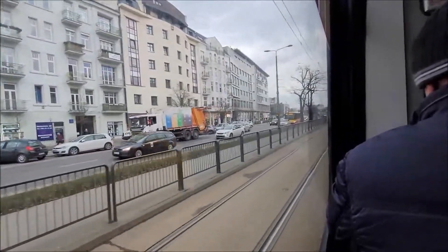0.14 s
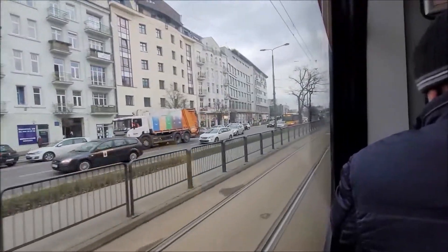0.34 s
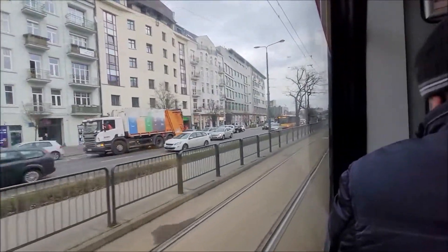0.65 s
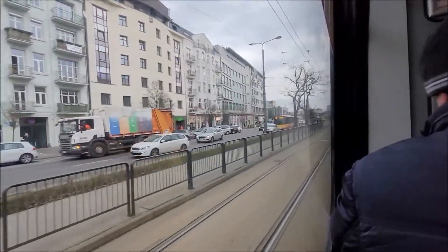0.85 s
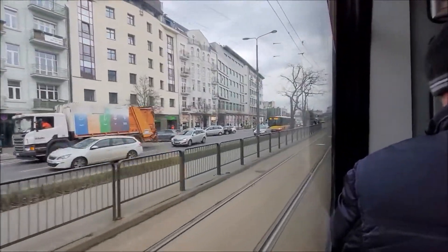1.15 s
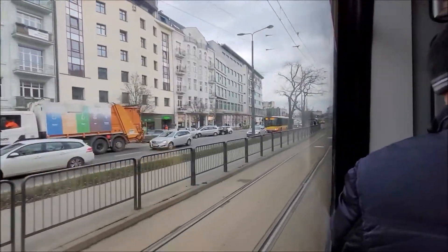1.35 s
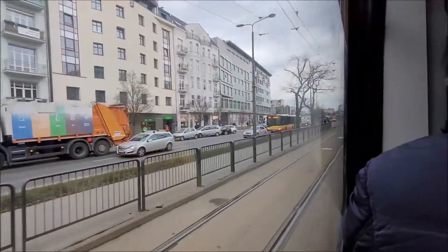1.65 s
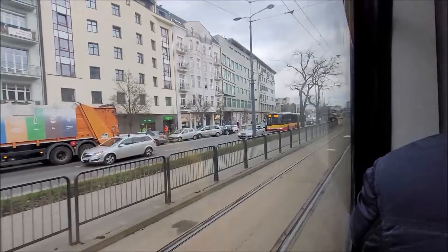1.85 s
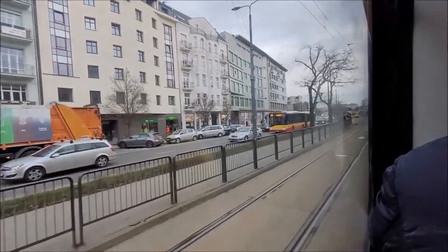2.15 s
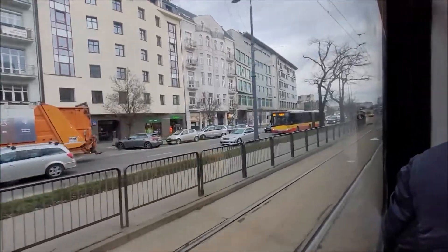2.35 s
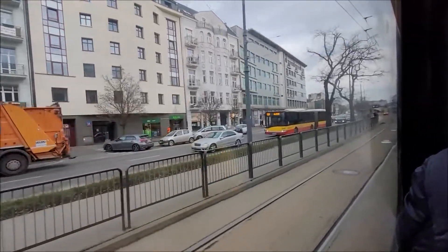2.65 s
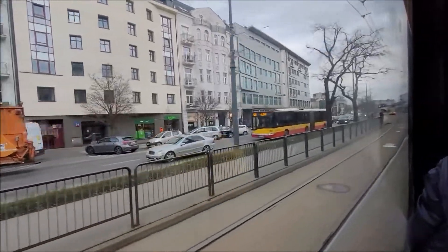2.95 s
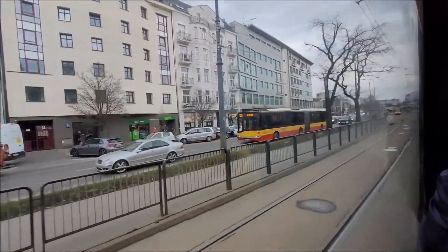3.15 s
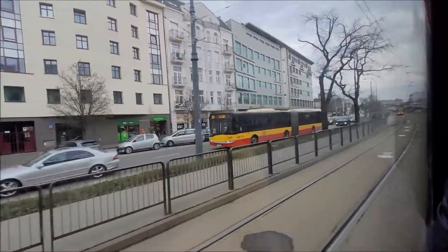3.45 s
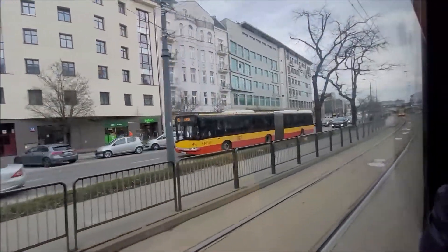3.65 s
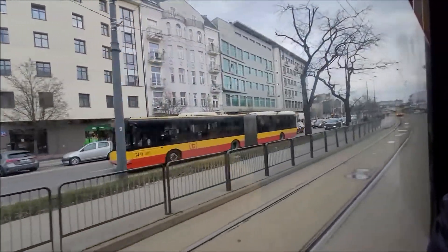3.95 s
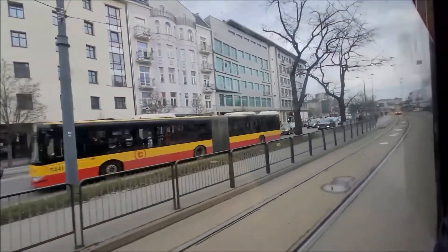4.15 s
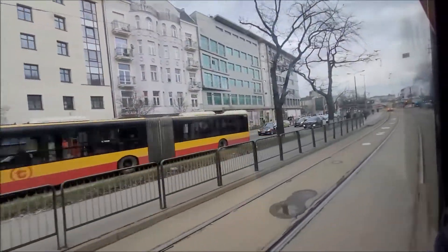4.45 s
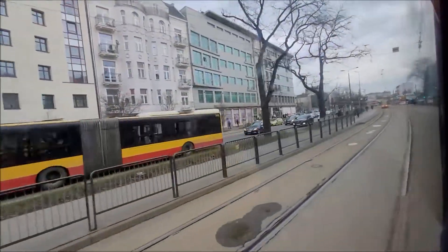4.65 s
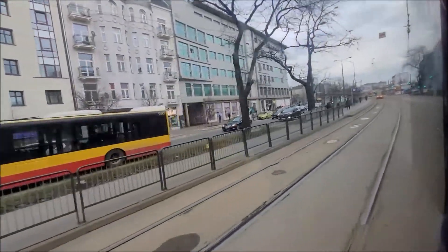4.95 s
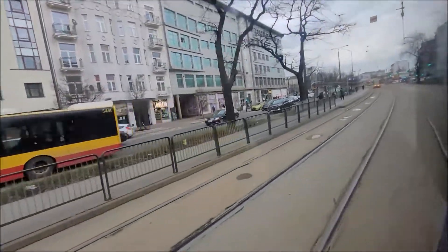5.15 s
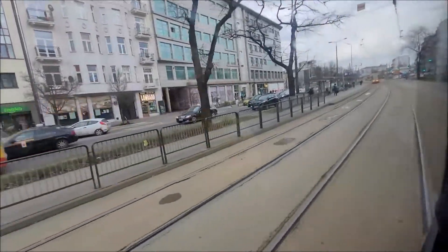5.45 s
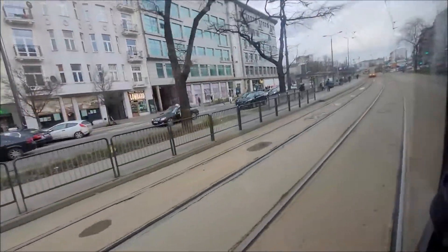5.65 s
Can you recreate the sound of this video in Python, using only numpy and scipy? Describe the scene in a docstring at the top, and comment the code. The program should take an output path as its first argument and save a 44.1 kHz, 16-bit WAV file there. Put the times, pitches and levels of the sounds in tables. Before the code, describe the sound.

Stereo from inside a rolling tram. A bass-heavy rumble and throbbing drone run throughout, with a soft gear tone sinking in pitch and fading by about 1.5 seconds. Rippled rail makes the drone surge and growl mid-way, then it eases. After five seconds a cluster of heavy thuds and clacks shakes the car, with small rattles and ticks behind and a faint steel hiss.

```python
"""Tram wheels roll along a street, heard in stereo from inside the car.
The wheels are noise and wavering modes: a throbbing drone that surges on rippled rail, a body boom and shake
at bumps, rumble, rush and roar; struck modes knock at gaps. A gear tone sinks in pitch and fades.
Farther back, filtered noise hisses as steel slides on steel, high harmonics and two narrow noise bursts
squeak thinly, and other short noise bursts tick, snap and rattle as loose fittings."""
import sys
import numpy as np
from scipy import signal
from scipy.fft import rfft, irfft
from scipy.io import wavfile
from scipy.ndimage import uniform_filter1d

SR = 44100
rng = np.random.default_rng(int(sys.argv[2]) if len(sys.argv) > 2 else 0)


def transcribe(signal):
    """Save signal, clipped to [-1, 1], as a 16-bit WAV file at the path in sys.argv[1]."""
    frames = np.atleast_2d(signal).T
    limited = np.clip(frames, -1, 1)
    pcm = np.round(limited * 32767).astype(np.int16)
    wavfile.write(sys.argv[1], SR, pcm)


N = 255780
TIME = np.arange(N) / SR  # seconds

# Likeness of the left and right microphones. Each row: frequency in Hz, correlation from -1 to 1.
LIKENESS = [(30, 1), (70, 0.8), (140, 0.98), (250, 0.92), (500, 0.62), (850, 0.16), (1250, -0.34),
            (1900, 0.1), (3000, -0.17), (15000, -0.09)]
# Lean of the stereo picture. Each row: frequency in Hz, left minus right in dB.
LEAN = [(30, -2.5), (70, -0.5), (130, -1.3), (280, 2), (600, 3), (1000, 2.5), (1600, -0.5), (2400, 4),
        (4000, 1), (8000, -7), (15000, 0.5)]
EDGE_HZ = 15750  # upper band limit of the recorder

# Ticks of small loose fittings. Each row: start in seconds, level in dB before a common trim, ring in Hz.
TICKS = [(1.281, -56, 5770), (1.3955, -63, 5500), (2.119, -66, 11000), (2.198, -61.5, 10500),
         (2.347, -60.5, 10500), (2.365, -61, 10500), (2.718, -58, 11000), (2.774, -52, 7000),
         (2.811, -53, 6940), (2.85, -55, 6960), (3.297, -65, 13300), (3.5367, -60, 6940),
         (3.636, -51, 3980), (3.889, -63, 12000), (4.035, -55, 7300), (4.2678, -56, 7300),
         (4.6915, -50, 7450), (5.1595, -48, 7560), (5.193, -55, 7700), (5.2352, -54, 7600),
         (5.306, -48.5, 7740), (5.461, -47.5, 10800), (5.6442, -47, 8200), (5.7294, -41.5, 7750)]
# Snaps of the window frames as the body twists. Each row: start in seconds, level in dB, centre in Hz.
SNAPS = [(2.0478, -53.5, 6500), (3.0772, -53, 8000), (4.616, -52, 4000), (5.084, -44, 3400),
         (5.088, -49, 3400), (5.2395, -45, 2200), (5.257, -46, 2800), (5.2692, -39.5, 2100)]
# Rattles and knocks of loose panels, and two brief narrow squeaks (4.47, 4.61). Each row: start in seconds,
# level in dB before a common trim, length in seconds (the swell peaks at half of it), centre in Hz,
# spread in octaves.
RATTLES_AND_SQUEAKS = [(1.192, -64, 0.026, 2500, 1.1), (1.477, -45.5, 0.061, 2180, 0.55),
                       (1.501, -50, .026, 3200, .8), (1.589, -49, 0.041, 1500, 0.78),
                       (2.033, -58, .03, 3000, 1.3), (2.219, -46, 0.0057, 804, 0.8),
                       (2.496, -53, 0.034, 1900, 0.63), (2.657, -46, 0.054, 950, 1.1),
                       (2.955, -39, 0.028, 920, 0.48), (2.965, -54, 0.033, 1790, 1),
                       (3.06, -45, 0.06, 1250, 0.94), (3.63, -61, 0.039, 3900, 0.42),
                       (3.665, -63, .06, 3700, .5), (4.47, -63, .045, 5700, .08),
                       (4.61, -66, 0.043, 4820, .08), (4.91, -50, .005, 1500, .8),
                       (5.248, -61, 0.042, 2600, 0.55)]

# Squeak of steel on steel. Each row: harmonic number, level in dB.
SQUEAK_HARMONICS = [(7, -6), (8, 0), (9, -2), (10, 1), (11, -1)]
SQUEAK_HZ = 1423  # fundamental, itself unheard
# Squeaks. Each row: peak in seconds, length in seconds, level in dB.
SQUEAKS = [(4.15, 0.037, -64.5), (4.3, .04, -73), (4.46, 0.08, -64), (4.67, 0.05, -65), (4.975, .04, -59)]
# Faint ringing of a wheel. Each row: peak in seconds, length in seconds, level in dB.
RINGS = [(3.27, 0.056, -77), (3.48, 0.077, -81), (3.78, .04, -77), (5.35, 0.12, -79)]

# Steady sliding of steel on steel. Each row: time in seconds, hiss in dB, fine fizz in dB.
SLIDE = [(0, -69, -71), (.22, -66, -74), (.6, -62, -63.5), (1.05, -66, -70.5), (1.45, -63, -74),
         (1.85, -68, -74), (2.75, -64, -71.5), (3.0, -66.5, -73), (3.5, -67.5, -74), (3.84, -66, -72),
         (3.96, -60.5, -65.5), (4.7, -60, -66), (4.85, -65, -68), (5.4, -57, -62.5), (5.78, -57.5, -61)]
# Brief rubs of a wheel on the rail. Each row: peak in seconds, length in seconds, hiss in dB, fizz in dB.
RUBS = [(.08, 0.043, -60, -61), (.32, 0.068, -57.5, -58), (.57, .05, -61.5, -76), (1.21, 0.056, -63, -68),
        (1.533, 0.034, -56.5, -69), (2.06, 0.018, -63, -68), (2.72, 0.023, -62.5, -65),
        (3.115, .035, -61.5, -70.5), (3.685, 0.031, -62.5, -66), (4.93, .03, -58.5, -62.5)]
# Scrapes of a wheel flange. Each row: peak in seconds, length in seconds, level in dB.
SCRAPES = [(2.73, 0.056, -68.5), (2.815, 0.02, -65), (2.868, 0.015, -70)]
# Colours of the sliding layers. Each row: frequency in Hz, relative density in dB per Hz.
HISS_COLOUR = [(1200, -24.5), (2500, -4.5), (3700, 2.5), (4800, 0.5), (6000, -4), (7900, -3), (9200, -11),
               (15000, -34.5)]
FIZZ_COLOUR = [(3000, -28), (6500, -7.5), (9300, 1), (11500, 2.5), (13500, 1), (15700, -5)]
SCRAPE_COLOUR = [(3500, -28), (5600, -0.5), (6400, 3), (8100, 1), (9300, -16.5), (13000, -31)]

# Pitch of the meshing gear teeth. Each row: time in seconds, pitch in Hz.
GEAR_PITCH = [(0, 171.5), (.3, 167.5), (.75, 160.8), (1.0, 158.6), (1.6, 152.5)]
# Load on the gears. Each row: time in seconds, level in dB.
GEAR_LEVEL = [(0, -33), (.04, -32.5), (.3, -29.5), (.74, -31.5), (.9, -26.5), (1.3, -25), (1.42, -39.5),
              (1.65, -44)]
# Whine of the other gears. Each row: time in seconds, level in dB.
WHINE_LEVEL = [(0, -62), (.6, -60), (.85, -63), (1.15, -59.5), (1.38, -54), (1.5, -63), (1.9, -72)]
# Other gears turning with the mesh. Each row: ratio to the mesh pitch, level in dB.
GEAR_ORDERS = [(3, -2), (4.82, 0)]

# Roar of the wheel treads. Each row: time in seconds, level in dB.
ROAR = [(0, -51.5), (.35, -48), (.9, -50.5), (1.55, -47.5), (1.75, -51.5), (2.3, -52), (2.6, -51.5),
        (3.08, -51.5), (3.28, -54.5), (3.65, -51.5), (4.3, -52.5), (5.02, -51.5), (5.35, -45.5),
        (5.78, -48)]
# Colours of the rolling layers and the body shake. Each row: frequency in Hz, relative density in dB per Hz.
ROAR_COLOUR = [(300, -29.5), (600, 1.5), (850, 1), (1120, 1), (1250, -0.5), (1480, 1.5), (1720, -3),
               (1930, -4), (2100, -7.5), (2350, -9.5), (2900, -13.5), (5000, -39)]
RUSH_COLOUR = [(110, -21), (160, 5.5), (190, 2), (232, 8), (295, 0), (340, -3.5), (440, 0), (540, 1),
               (700, -5.5), (850, -11.5), (1100, -21), (2500, -55)]
RUMBLE_COLOUR = [(60, -30), (100, 5), (128, 5), (157, 7), (190, 0), (232, 2.5), (262, -3), (295, -1.5),
                 (335, -8.5), (375, -6.5), (420, -12), (520, -33), (1100, -46.5), (3000, -80)]
SHAKE_COLOUR = [(10, -22.5), (23, 0), (31, -16), (41, -8), (51, 0.5), (63, -5.5), (80, -19.5), (160, -75.5)]

# Knocks of the wheels at gaps in the rail. Each row: start in seconds, thud in dB, clack in dB.
KNOCKS = [(0.502, -35, -57), (0.552, -35, -47), (2.146, -47, -51), (2.397, -51, -44), (2.619, -42, -45.5),
          (2.756, -31.5, -48), (2.965, -35, -43.5), (3.532, -61, -42), (3.812, -51, -59), (4.367, -37, -56),
          (5.081, -32, -48), (5.134, -24, -53), (5.186, -43, -49), (5.221, -26.5, -44), (5.248, -34, -50),
          (5.265, -40, -45), (5.372, -24, -35.5), (5.479, -21.5, -41), (5.504, -23, -51.5),
          (5.557, -25.5, -42), (5.631, -34, -50), (5.671, -32, -40)]
# Modes a knock rings: floor (thud), running gear (clack). Each row: pitch in Hz, level in dB,
# 60 dB decay in seconds.
THUD_MODES = [(170, -1.5, 0.12), (240, 5, 0.066), (308, 0.5, 0.072), (375, -1.5, 0.026)]
CLACK_MODES = [(495, -1, 0.045), (568, -1, 0.088), (670, -6, 0.024), (830, -6, 0.068), (1240, -11, 0.023)]

# Roughness of the rail under the wheels. Each row: time in seconds, dB above smooth rail.
TRACK = [(0, 4.5), (1.55, 0.5), (1.8, -1.5), (2.2, 2.5), (2.48, 9.5), (3.05, 7.5), (3.3, 3.5), (3.6, 6.5),
         (4.1, 5.5), (4.45, 0.5), (5.03, 2), (5.2, 9), (5.55, 11.5), (5.78, 5)]
# Bumps at dips and joints in the rail. Each row: peak in seconds, length in seconds, body shake in dB,
# floor boom in dB, rumble in dB, rush in dB.
BUMPS = [(.275, 0.034, -22, -24.5, -24.5, -52), (.54, 0.027, -26, -31.5, -26.5, -36),
         (.65, 0.038, -30.5, -26.5, -47, -40), (1.35, 0.27, -41, -36, -46, -55),
         (1.53, 0.16, -48, -49, -34.5, -43.5), (2.67, 0.033, -43.5, -22, -31.5, -41),
         (2.96, 0.077, -36, -31, -29.5, -49), (3.91, 0.057, -37, -26.5, -31, -50),
         (4.22, 0.039, -35, -21.5, -40, -63), (4.48, 0.022, -52, -19.5, -52, -57),
         (4.76, 0.19, -46, -24.5, -36.5, -64), (5.118, 0.032, -40, -20.5, -35.5, -45),
         (5.26, 0.12, -33, -18.5, -26.5, -53), (5.394, 0.0061, -16, -10, -39, -43),
         (5.51, 0.068, -29, -17.5, -27, -40), (5.65, 0.048, -24, -38, -33, -40),
         (5.78, 0.033, -41, -15.5, -34, -37)]
# How each layer follows the track: level on smooth rail in dB, dB per dB of roughness.
SHAKE_LAW, BOOM_LAW = (-37.5, -.2), (-36.5, .55)
RUMBLE_LAW, RUSH_LAW = (-37.3, .9), (-44.2, .36)
DRONE_LAW = (-31, .27)

# Patches of rippled rail. Each row: peak in seconds, length in seconds, drone in dB, growl in dB.
RIPPLES = [(2.395, 0.023, -15.5, -26), (2.505, 0.033, -15.5, -25.5), (2.68, 0.047, -14.5, -29),
           (2.86, 0.16, -24, -33), (3.0, 0.085, -22.5, -32), (3.25, 0.053, -25.5, -36),
           (3.44, 0.071, -32, -32.5), (3.59, 0.046, -23.5, -29.5), (3.86, 0.11, -47, -38),
           (4.52, 0.036, -22.5, -47), (4.68, 0.017, -18, -54), (4.77, 0.011, -20, -50),
           (4.9, 0.072, -21.5, -60), (5.23, 0.018, -26.5, -51), (5.65, 0.092, -37, -39)]
# Drone of the wheels. Each row: time in seconds, pitch in Hz.
DRONE_PITCH = [(0, 105.5), (2.2, 106), (2.5, 100.5), (2.72, 104), (3.3, 105.5), (3.45, 101.5), (3.62, 104),
               (4.5, 105.5)]
DRONE_WAVER = .015  # random swing of the pitch, as a fraction of it
GROWL_RATIO, OVERTONE_DB = 2.13, -13  # growl pitch over drone pitch; overtone level against the growl
BOOM_HZ = 81
# The drone throbs once in every turn of the wheels, which slow a little.
FIRST_THROB_S, WHEEL_TURNS_PER_S, SLOWING_PER_S2 = .14, 3.7, .13
THROB_DB = 5.8  # swing each way at zero roughness
THROB_LOSS = 1  # the throb evens out on rough track: dB per dB of roughness


def gain_of(db):
    """Decibels to amplitude."""
    return np.exp(np.asarray(db, np.float32) * np.float32(np.log(10) / 20))


def evened(x):
    """Scales to rms 1."""
    return x / np.sqrt(np.mean(abs(x) ** 2) + 1e-30)


def curve(rows, column=1):
    """One column of a time table at every sample."""
    rows = np.array(rows)
    return np.interp(TIME, rows[:, 0], rows[:, column])


def read(points, hz):
    """Reads a spectrum on a log-frequency axis."""
    f, value = np.transpose(points)
    return np.interp(np.log(hz + 1), np.log(f + 1), value)


def add(mix, s, sound):
    """Mixes a stereo sound in at time s."""
    part = mix[:, round(s * SR):][:, :sound.shape[1]]
    part += sound[:, :part.shape[1]]


def noise():
    """Two channels of white noise."""
    return rng.standard_normal((2, N), dtype=np.float32)


def drift(width_hz, size=2048):
    """Slow complex random motion of rms 1, weakening in rate above width_hz."""
    hz = np.fft.fftfreq(size, N / SR / size)
    z = rng.standard_normal(size) + 1j * rng.standard_normal(size)
    slow = evened(np.fft.ifft(z / (1 + (hz / width_hz) ** 4)))
    return np.interp(TIME, np.linspace(0, N / SR, size), slow).astype(np.complex64)


def turn(hz):
    """Unit phasor that follows a pitch."""
    cycles = np.cumsum(hz * np.ones(N)) / SR
    angle = (2 * np.pi * (cycles - np.floor(cycles))).astype(np.float32)
    return np.cos(angle) + 1j * np.sin(angle)


def swells(rows, column=2, release=1.38):
    """Amplitude of rounded swells (peak time, length, dB) that fade more slowly than they rise."""
    power = np.zeros(N)
    for row in rows:
        near = abs(TIME - row[0]) < 6 * row[1]
        u = (TIME[near] - row[0]) / row[1]
        u = np.where(u < 0, u, u / release)
        power[near] += gain_of(row[column]) ** 2 / np.cosh(1.275 * u) ** 2
    return np.sqrt(power)


def jolted(law, column):
    """Amplitude of a layer shaken by the track's roughness and by each bump."""
    smooth_db, slope = law
    steady = gain_of(smooth_db + slope * curve(TRACK))
    return np.hypot(steady, swells(BUMPS, column=column))


def cabin(x, colour):
    """Colours two unrelated channels; the cabin makes bass alike at both ears and leaves treble diffuse."""
    hz = np.fft.rfftfreq(N, 1 / SR)
    a, b = rfft(x) * gain_of(read(colour, hz))
    same = np.clip(read(LIKENESS, hz), -1, 1)
    lean = gain_of(read(LEAN, hz) / 2)
    mid, side = a * np.sqrt(1 + same), b * np.sqrt(1 - same)
    return evened(irfft(np.array([(mid + side) * lean, (mid - side) / lean]), N))


def patchy(x, depth_db, size=(7, 3)):
    """Narrow resonances of the steel flare up and fade at random; size is in (frames, bins)."""
    z = signal.stft(x, nperseg=1024, noverlap=512)[2]
    field = rng.standard_normal(z.shape[:0:-1])  # frames by bins
    field = uniform_filter1d(field, size[0], 0)
    field = evened(uniform_filter1d(field, size[1], 1))
    return signal.istft(z * gain_of(depth_db * field.T), nperseg=1024, noverlap=512)[1][:, :N]


def resonance(hz, width_hz, steadiness, side_db):
    """A randomly driven mode; steadiness 0-1 evens out its beating, side_db sets its left-right difference."""
    swing = drift(width_hz)
    swing = evened(swing / (abs(swing) + 0.15) ** np.clip(steadiness, 0, 1))
    side = gain_of(side_db) * drift(width_hz)
    return np.sqrt(2) * (np.array([swing + side, swing - side]) * turn(hz)).real


def burst(envelope, centre_hz, octaves):
    """A dense cluster of modes around one pitch, as noise shaped by an envelope."""
    size = len(envelope)
    hz = np.fft.rfftfreq(size, 1 / SR)
    shape = 1 / (1 + (np.log2((hz + 1) / centre_hz) / octaves) ** 4)
    return envelope * evened(irfft(rfft(rng.standard_normal((2, size))) * shape, size))


def struck(modes, side_db, attack_s=.004, scatter=.04):
    """One blow on a set of decaying modes, a little different each time; rms 1 over its first 12.5 ms."""
    t = TIME[:SR // 5]
    ring = np.zeros((2, len(t)))
    for hz, db, t60 in modes:
        detune, phase, apart = rng.uniform(-1.09, 1, 3)
        ears = np.array([[1], [-1]]) * np.pi * apart * gain_of(side_db)  # opposite phase shifts
        decay = np.exp(-np.log(1000) * t / t60)
        angle = 2 * np.pi * hz * (1 + scatter * detune) * t + np.pi * phase + ears
        ring += gain_of(db) * decay * np.sin(angle)
    ring *= 1 - np.exp(-t / attack_s)
    return ring / np.sqrt(np.mean(ring[:, :SR // 80] ** 2))


def fittings():
    """Small parts tick once, frames snap, and panels chatter or squeak in a short, gritty swell."""
    out, t = np.zeros((2, N)), TIME[:SR // 2]
    tick_trim_db, swell_trim_db = -2, -4.5
    tail = gain_of(-16) * np.exp(-t / .02)
    tick = np.exp(-t / .0022) + tail
    for s, db, hz in TICKS:
        add(out, s, gain_of(db + tick_trim_db) * burst(tick, hz, octaves=0.25))
    snap = np.exp(-t / .0012) + tail
    for s, db, hz in SNAPS:
        add(out, s, gain_of(db) * burst(snap, hz, octaves=1.0))
    for s, db, length, hz, octaves in RATTLES_AND_SQUEAKS:
        swell = 2 * t / length * np.exp(1 - 2 * t / length)
        grit = evened(gain_of(4 * drift(140).real[:len(t)]))
        add(out, s, gain_of(db + swell_trim_db) * burst(swell * grit, hz, octaves))
    return out


def squeal():
    """Steel sticks and slips in a thin, rasping squeak of high harmonics; a wheel rings faintly."""
    hz = SQUEAK_HZ * (1 + 0.0022 * drift(30).real)
    squeak = sum(gain_of(db) * resonance(k * hz, width_hz=45, steadiness=0.12, side_db=3.0)
                 for k, db in SQUEAK_HARMONICS)
    rasp = 1 + .75 * evened(uniform_filter1d(noise(), size=40, axis=1))  # uneven slips blur every harmonic
    squeaks = swells(SQUEAKS) * gain_of(3.1 * drift(25).real) * evened(squeak * rasp)
    ring = resonance(4955, width_hz=45, steadiness=.2, side_db=2.0)
    return squeaks + swells(RINGS) * ring


def sliding(grains_per_s=260, grain_db=12):
    """Steel slips on steel: hiss and fizz with tiny crackles swell at each rub, and a flange scrape judders."""
    grains = (rng.random((2, N)) < grains_per_s / SR) * noise() * gain_of(grain_db)
    slip = patchy(noise(), depth_db=2.0) + grains
    bite = drift(40).real  # the contact grips unevenly
    hiss_level = np.hypot(gain_of(curve(SLIDE)), swells(RUBS))
    hiss = hiss_level * gain_of(1.2 * bite) * cabin(slip, HISS_COLOUR)
    fizz_level = np.hypot(gain_of(curve(SLIDE, column=2)), swells(RUBS, column=3))
    fizz = fizz_level * gain_of(1.5 * bite) * cabin(slip[::-1], FIZZ_COLOUR)  # channels swapped
    scrape = swells(SCRAPES) * gain_of(3 * drift(60).real) * cabin(noise(), SCRAPE_COLOUR)
    return hiss + fizz + scrape


def gears(waver=.025):
    """Meshing teeth give a clean falling tone; other gears whine faintly above it."""
    hz = curve(GEAR_PITCH) * (1 + .0008 * drift(8).real)
    tone = np.sqrt(2) * (turn(hz) * (1 + waver * drift(12))).real
    mesh = tone * gain_of([[.4], [-.4]])  # slightly to the left
    whine = sum(gain_of(db) * resonance(ratio * hz, width_hz=7, steadiness=.3, side_db=-5)
                for ratio, db in GEAR_ORDERS)
    return gain_of(curve(GEAR_LEVEL)) * mesh + gain_of(curve(WHINE_LEVEL)) * whine


def rolling():
    """Rough wheel treads give a lumpy rumble, a hollow rush and, above them, a roar with small knocks in it."""
    rumble = jolted(RUMBLE_LAW, column=4) * gain_of(1.2 * drift(25).real) * cabin(noise(), RUMBLE_COLOUR)
    rush = jolted(RUSH_LAW, column=5) * gain_of(1.6 * drift(25).real) * cabin(noise(), RUSH_COLOUR)
    knocks = (rng.random(N) < 90 / SR) * noise() * gain_of(13.5)  # about 90 a second
    tread = patchy(noise(), depth_db=2.0) + knocks
    roar = gain_of(curve(ROAR) + 1.3 * drift(25).real) * cabin(tread, ROAR_COLOUR)
    return rumble + rush + roar


def wheel_knocks():
    """Wheels strike gaps in the rail: the floor thuds and the running gear clacks."""
    out = np.zeros((2, N))
    for s, thud_db, clack_db in KNOCKS:
        thud = gain_of(thud_db) * struck(THUD_MODES, side_db=-16.0)
        clack = gain_of(clack_db) * struck(CLACK_MODES, side_db=-11.0)
        add(out, s, thud + clack)
    return out


def rippled_rail(drone_hz):
    """Ripples on the rail head make the wheels growl about an octave above the drone, wavering with it."""
    hz = GROWL_RATIO * drone_hz
    growl = resonance(hz, width_hz=9, steadiness=0.8, side_db=-17.5)
    overtone = gain_of(OVERTONE_DB) * resonance(1.5 * hz, width_hz=15, steadiness=0.18, side_db=-6.5)
    return swells(RIPPLES, column=3) * (growl + overtone)


def car_body(drone_hz):
    """Uneven rail drives low floor and cabin modes; the drone throbs as wheels turn and surges over ripples."""
    t, rough = TIME - FIRST_THROB_S, curve(TRACK)
    turns = WHEEL_TURNS_PER_S * t - SLOWING_PER_S2 * t ** 2 / 2
    throb = np.maximum(THROB_DB - THROB_LOSS * rough, 0) * np.cos(2 * np.pi * turns)
    smooth_db, slope = DRONE_LAW
    drive = np.hypot(gain_of(smooth_db + slope * rough + throb), swells(RIPPLES, column=2))
    drone = drive * resonance(drone_hz, width_hz=4.5, steadiness=0.8, side_db=-21.5)
    boom_mode = resonance(BOOM_HZ, width_hz=6.9, steadiness=0.61, side_db=-15.0)
    boom = jolted(BOOM_LAW, column=3) * boom_mode
    shake = jolted(SHAKE_LAW, column=2) * cabin(noise(), SHAKE_COLOUR)
    return drone + boom + shake


def scene():
    """Everything that reaches the microphones in the cabin."""
    drone_hz = curve(DRONE_PITCH) * (1 + DRONE_WAVER * drift(9.4).real)
    background = fittings() + squeal() + sliding() + gears()
    wheels = rolling() + wheel_knocks() + rippled_rail(drone_hz) + car_body(drone_hz)
    return background + wheels


def record(dry):
    """The recorder's band limit: a linear-phase low-pass."""
    lowpass = signal.firwin(511, EDGE_HZ, window=("kaiser", 9), fs=SR)
    return signal.oaconvolve(dry, lowpass[None], "same", axes=1)


dry = scene()
out = record(dry)
transcribe(out)
```